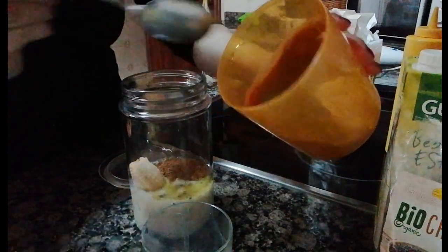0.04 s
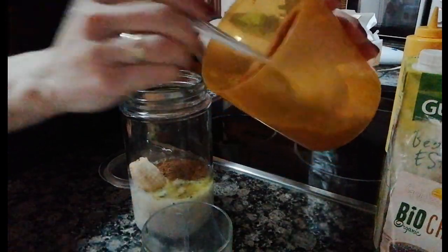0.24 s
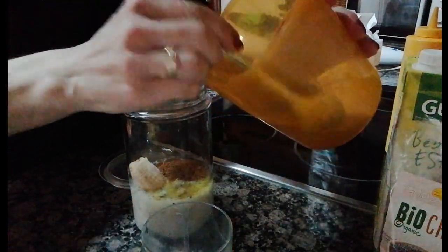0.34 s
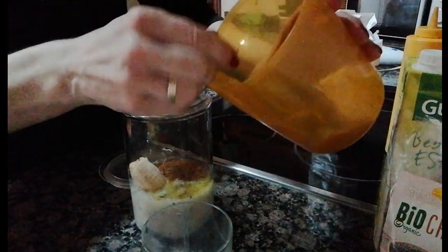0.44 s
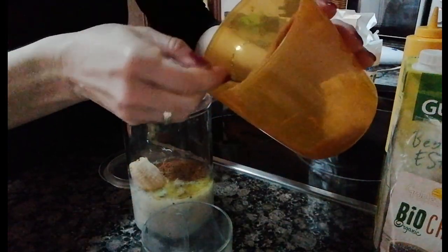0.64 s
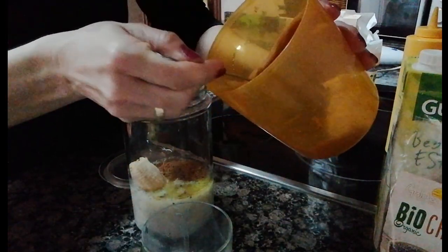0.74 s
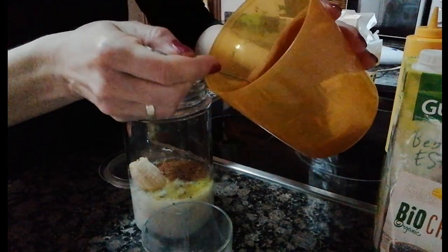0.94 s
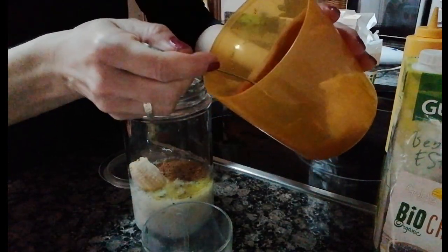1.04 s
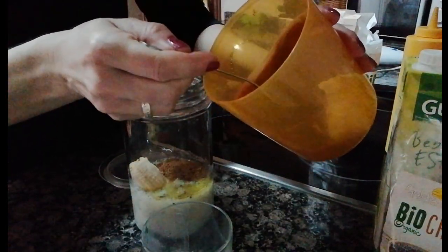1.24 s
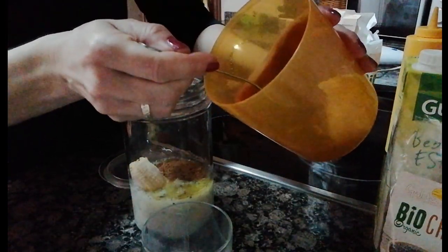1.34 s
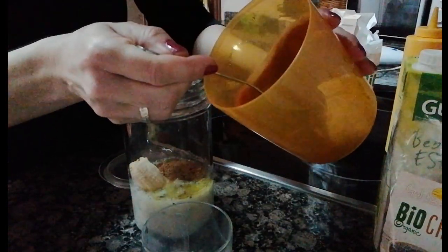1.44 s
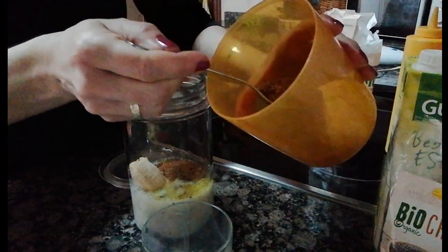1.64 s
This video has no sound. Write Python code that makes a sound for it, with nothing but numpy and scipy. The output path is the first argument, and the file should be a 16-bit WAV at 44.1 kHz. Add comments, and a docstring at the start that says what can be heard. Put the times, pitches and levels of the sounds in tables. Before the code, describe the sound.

A metal spoon scoops sugar from a plastic tub, heard close in a small quiet kitchen. Faint hum and rumble come first. At 0.24 seconds a loud, hollow clack strikes the tub, with a faint metallic ring; gritty crunching follows in three shoves until about 0.7, with another knock near 0.37. The spoon slides out lightly, ticking, clinks at 0.95, then only sparse, very faint ticks remain.

```python
"""Quiet kitchen, close microphones: a metal spoon is pushed into a tilted plastic tub of sugar.
It strikes the wall (noise bursts), crunches through the sugar in three shoves (random grain clicks)
and knocks the tub, which rings hollowly (damped modes). It slides out with small ticks and one clink.
A faint spoon ring (decaying sines), mains hum and room rumble (shaped noise) lie underneath."""
import sys
import numpy as np
from scipy import signal
from scipy.fft import rfft, irfft
from scipy.io import wavfile

SR = 44100
rng = np.random.default_rng(int(sys.argv[2]) if len(sys.argv) > 2 else 0)


def store_wav(level_fs):
    """Save 16-bit WAV to argv[1]."""
    pcm = np.round(np.clip(np.atleast_2d(level_fs), -1, 1) * 32767)
    wavfile.write(sys.argv[1], SR, pcm.T.astype(np.int16))


N = 74970
LEFT_LAG_S = 0.00077


def amp(db):
    """Decibels to gain."""
    return 10 ** (np.asarray(db) / 20)


def evened(x):
    """Scales to rms 1 over all channels."""
    return x / np.sqrt(np.mean(x ** 2) + 1e-20)


def read(points, hz):
    """Interpolates a table on a log-frequency axis."""
    f, value = np.transpose(points)
    return np.interp(np.log(hz + 1), np.log(f), value)


def level(points):
    """Gain over time from (time [s], level [dB]) points, practically silent outside them."""
    s, db = np.transpose(points)
    return amp(np.interp(np.arange(N) / SR, s, db, left=-140, right=-140))


def add(mix, s, sound):
    """Mixes a sound in at time s, cut at the end of the mix."""
    part = mix[..., round(s * SR):][..., :sound.shape[-1]]
    part += sound[..., :part.shape[-1]]


def convolve(x, response):
    """Passes both channels through a response."""
    return signal.fftconvolve(np.atleast_2d(x), np.atleast_2d(response), axes=1)[:, :N]


def dying(t, t60):
    """Exponential decay, 60 dB in t60."""
    return np.exp(-np.log(1000) * t / t60)


# level of the tub's sounds, left minus right: (frequency [Hz], level [dB])
LEFT_OVER_RIGHT = [(150, 1), (430, -3), (620, -7), (1100, -4.5), (2300, 1), (3700, -6), (5000, -3.5),
                   (7500, -2), (12000, 2.5)]


def colour(x, points):
    """Minimum-phase filter of unit mean power with the given spectrum and left-right balance."""
    hz = abs(np.fft.fftfreq(4096, 1 / SR))
    tilt_db = np.outer([.5, -.5], read(LEFT_OVER_RIGHT, hz))
    log_gain = np.log(amp(read(points, hz) + tilt_db))
    spectrum = np.exp(np.conj(signal.hilbert(log_gain)))
    taps = np.fft.ifft(spectrum).real[:, :len(hz) // 2]
    return convolve(x, taps / np.sqrt(np.sum(taps ** 2) / 2))


# reverberation time: (frequency [Hz], t60 [s])
ROOM_T60 = [(200, 0.75), (1000, 0.29), (5000, 0.25), (15000, 0.26)]
ROOM_BUILD_S = 0.00183


def in_room(x, wet_db, size=256):
    """Adds the kitchen's reflections: a noise tail that builds up quickly, its bass lasting longest."""
    hz, t, z = signal.stft(rng.standard_normal((2, SR // 2)), SR, nperseg=size)
    decay = amp(-60 * t / read(ROOM_T60, hz)[:, None])
    build = 1 - np.exp(-t / ROOM_BUILD_S)
    tail = signal.istft(z * decay * build, SR, nperseg=size)[1]
    return x + amp(wet_db) * convolve(x, tail / np.linalg.norm(tail[0]))


SHARED_HZ = 1045


def pair(x):
    """Two close microphones: the bass is shared and reaches the left later, the treble differs."""
    hz, (left, right) = np.fft.rfftfreq(N, 1 / SR), rfft(x)
    shared = 1 / (1 + (hz / SHARED_HZ) ** 4)
    lagged = right * np.exp(-2j * np.pi * hz * LEFT_LAG_S)
    return irfft([shared * lagged + np.sqrt(1 - shared ** 2) * left, right], N)


# mains hum: (frequency [Hz], rms level [dB])
HUM = [(99.7, -59), (201, -72.5), (300, -67.5), (350, -72)]
HUM_WAVER = .45
# room rumble and hiss: (frequency [Hz], level [dB])
FLOOR_COLOUR = [(15, -6.5), (35, -0.5), (70, -4), (170, -5.5), (260, -10.5), (340, -11.5), (480, -24.5),
                (1000, -20.5), (2500, -26.5), (5000, -25.5), (15500, -31)]
FLOOR_RMS_DB, FLOOR_MONO_HZ = -58, 421
RUMBLE_APART_HZ, RUMBLE_RIGHT_DB = 63, 3


def kitchen(count=14):
    """Wavering mains hum over rumble and thin hiss; the deepest rumble differs between microphones."""
    t, hz = np.arange(N) / SR, np.fft.rfftfreq(N, 1 / SR)
    z = rfft(rng.standard_normal((3, N)))
    deep = 1 / (1 + (hz / RUMBLE_APART_HZ) ** 4)
    shared = (1 - deep) / (1 + (hz / FLOOR_MONO_HZ) ** 2)
    gain = amp(read(FLOOR_COLOUR, hz) + np.outer([-.5, .5], RUMBLE_RIGHT_DB * deep))
    noise = z[:2] * np.sqrt(1 - shared) + z[2] * np.sqrt(shared)
    out = amp(FLOOR_RMS_DB) * evened(irfft(noise * gain, N))
    for line_hz, db in HUM:
        a, b = signal.resample(rng.standard_normal((2, count)), N, axis=1)
        waver = 1 + HUM_WAVER * (a + 1j * b)
        out = out + amp(db) * evened((waver * np.exp(2j * np.pi * line_hz * t)).real)
    return out


# starts of the spoon's ring: (time [s], gain on the modes [dB])
RING_STARTS = [(0, 3), (.284, 25.5)]
# modes of the spoon: (frequency [Hz], level before that gain [dB], t60 [s])
SPOON_MODES = [(2170, -62.5, 0.3), (2220, -64.5, 0.42), (3904, -70.5, 0.17)]


def spoon():
    """Faint beating ring of the spoon: close modes dying away, phased apart per channel."""
    out, t = np.zeros((2, N)), np.arange(N) / SR
    for s, ring_db in RING_STARTS:
        for hz, db, t60 in SPOON_MODES:
            cycles = hz * t + rng.random((2, 1)) / 2
            add(out, s, amp(ring_db + db) * dying(t, t60) * np.sin(2 * np.pi * cycles))
    return out


TREBLE_HZ = 8000
SPOT_DB, SPOT_Q = -3.5, 3.4


def contacts(rows, t60, snap):
    """Each contact is a sharp snap and a scatter of decaying noise, tinted by the spot struck."""
    out, t = np.zeros((2, N)), np.arange(SR // 8) / SR
    treble = signal.butter(1, TREBLE_HZ, "high", fs=SR)
    for s, db, treble_db, spot_hz in rows:
        burst = rng.choice([-1., 1.], (2, len(t))) * dying(t, t60)
        burst[:, 0] = snap
        spot = signal.lfilter(*signal.iirpeak(spot_hz, SPOT_Q, fs=SR), burst)
        burst = burst + amp(SPOT_DB) * spot
        bright = (amp(treble_db) - 1) * signal.lfilter(*treble, burst)
        add(out, s, amp(db) * (burst + bright))
    return out


# spoon on tub wall: (time [s], level [dB], extra treble [dB], pitch of the struck spot [Hz])
STRIKES = [(.2338, -30.5, -8, 4750), (.2361, -11, 5, 1205), (.2395, -17, 6.5, 4910),
           (.2835, -23, 3.5, 1630), (.3010, -30, 9, 4540), (.3595, -20.5, -3, 3480),
           (.3660, -17.5, -20, 900)]
# (frequency [Hz], level [dB])
STRIKE_COLOUR = [(40, -16), (300, -4.5), (800, -5.5), (1300, -0.5), (2400, -8.5), (3400, 0), (4200, -1.5),
                 (4950, 4), (5700, -6), (7500, -1.5), (9500, -9.5), (15500, -14.5)]
STRIKE_T60_S, STRIKE_SNAP = 0.033, 5.5


def strikes():
    """The spoon strikes the tub wall: snaps and noise bursts in the wall's colour."""
    return colour(pair(contacts(STRIKES, STRIKE_T60_S, STRIKE_SNAP)), STRIKE_COLOUR)


# modes of the tub and the air in it: (frequency [Hz], level [dB], t60 [s])
TUB_MODES = [(270, -8, 0.12), (364, -8, 0.13), (434.7, -0.5, 0.065), (592.6, -1.5, 0.17), (636, -6.5, 0.12),
             (694, 0, 0.087), (819, -6.5, 0.15), (905, 3, 0.05), (1181, 0.5, 0.072), (1260, 0, .06)]
PUSH_OCTAVES, PUSH_S = 0.33, 0.00035


def tub_ring(push_hz, ring_share=1):
    """Modes near push_hz answer most, their t60 cut by the spoon to ring_share; the left lags."""
    t = np.maximum(np.arange(SR // 3) / SR - np.array([[LEFT_LAG_S], [0]]), 0)
    ring = 0
    for k, (hz, db, t60) in enumerate(TUB_MODES):
        tilt_db = np.array([[.5], [-.5]]) * read(LEFT_OVER_RIGHT, hz)
        gain = amp(db + tilt_db) / (1 + (np.log2(hz / push_hz) / PUSH_OCTAVES) ** 2)
        sign = (-1) ** k
        ring = ring + sign * gain * dying(t, t60 * ring_share) * np.sin(2 * np.pi * hz * t)
    return ring * (1 - np.exp(-t / PUSH_S))


# knocks on the tub: (time [s], level [dB], centre of the push [Hz], share of t60 left by the spoon [1])
KNOCKS = [(0.2357, -8.5, 427, .4), (.3655, -17.5, 664, 0.89), (.477, -26.5, 620, 0.77),
          (.9468, -40.5, 430, 0.12)]
# how firmly the scraping spoon bears on the wall: (time [s], level [dB])
WALL_PRESSURE = [(.24, -31), (.34, -6), (.39, 1.5), (.49, -4.5), (.61, -14), (.75, -0.5), (.80, -29)]
CRUNCH_PUSH_HZ, RING_ROOM_DB = 670, -15


def tub(drive):
    """The tub rings under the knocks and, softly, as the spoon scrapes along its wall."""
    ring = tub_ring(CRUNCH_PUSH_HZ)
    out = convolve(drive[0] * level(WALL_PRESSURE), ring / np.linalg.norm(ring[1]))
    for s, db, push_hz, ring_share in KNOCKS:
        add(out, s, amp(db) * tub_ring(push_hz, ring_share))
    return in_room(out, RING_ROOM_DB)


def grains(per_s, spread_db):
    """Sugar slipping: random clicks of uneven size, drawn separately for each microphone."""
    size = amp(spread_db * np.minimum(rng.exponential(1, N), 4))
    hit = rng.random(N) < per_s / SR
    return evened(size * hit * rng.standard_normal((2, N)))


# spoon crunching through the sugar: (time [s], level [dB])
CRUNCH = [(.236, -71), (.244, -26.5), (.272, -28.5), (.30, -30), (.325, -32), (.355, -29.5), (.385, -50),
          (.41, -39), (.445, -33.5), (.48, -30), (.544, -37.5), (.582, -40.5), (.606, -42), (.638, -34),
          (.664, -36), (.69, -44), (.76, -53.5), (.80, -62.5)]
# fine crystals: (frequency [Hz], level [dB])
CRUNCH_COLOUR = [(60, -19.5), (300, -10.5), (700, -5.5), (1000, -21.5), (1400, -1), (2600, -4), (3700, 3.5),
                 (5000, 4), (7000, 1), (10000, -5.5), (15500, -13.5)]
# cracking lumps: (frequency [Hz], level [dB])
LUMP_COLOUR = [(300, -17), (1400, -3), (3300, 0.5), (6000, -2.5), (15500, -15)]
# low rumble of the tub wall under the spoon: (frequency [Hz], level [dB])
RUB_COLOUR = [(30, -18.5), (130, -7.5), (230, 1.5), (330, -13), (480, -17), (1500, -43.5)]
GRAINS_PER_S, GRAIN_SPREAD_DB = 12000, 2.6
LUMPS_PER_S, LUMP_SPREAD_DB, LUMPS_DB = 1200, 1.7, -8
RUB_DB, DIG_ROOM_DB = -27, -7.5


def digging():
    """Wall strikes, then fine crystals and sparser lumps crunching; the crystals also drive the tub."""
    drive = pair(grains(GRAINS_PER_S, GRAIN_SPREAD_DB)) * level(CRUNCH)
    fine = colour(drive, CRUNCH_COLOUR)
    lump_drive = grains(LUMPS_PER_S, LUMP_SPREAD_DB) * level(CRUNCH)
    lumps = amp(LUMPS_DB) * colour(lump_drive, LUMP_COLOUR)
    rub = amp(RUB_DB) * colour(drive, RUB_COLOUR)
    return in_room(strikes() + fine + lumps + rub, DIG_ROOM_DB) + tub(drive)


# spoon sliding lightly out over the sugar: (time [s], level [dB])
SLIDE = [(.70, -60), (.775, -51), (.802, -43.5), (.826, -40), (.86, -48), (.90, -47.5), (.925, -50.5),
         (.972, -41), (1.01, -67), (1.12, -87)]
# spoon on rim: (time [s], level before TICKS_DB [dB], extra treble [dB], pitch of the struck spot [Hz])
TICKS = [(.8018, -41, -3, 4600), (.8313, -38, 2, 3600), (.8530, -39, -1, 4700), (.8866, -39, 3, 6200),
         (.8931, -36.5, 4, 6200), (.9292, -30, -6, 3800), (.9326, -29, -2, 4800), (.9468, -18, -3, 4900),
         (1.0745, -41, 1, 3500), (1.3305, -55, 1, 5500), (1.4620, -48.5, 2, 5600), (1.5640, -55, 2, 5800),
         (1.5722, -50, 5, 6000), (1.6820, -53, 2, 5800)]
# (frequency [Hz], level [dB])
TICK_COLOUR = [(80, -27.5), (300, -18.5), (1000, -15), (1700, -19), (2200, -13), (2800, -15.5),
               (3600, -1.5), (4200, -5.5), (4800, 2), (5600, -5.5), (6800, -1), (8200, -8), (15500, -19.5)]
SLIDE_PER_S, SLIDE_SPREAD_DB = 9000, 2.4
TICK_T60_S, TICK_SNAP, TICKS_DB, TICK_ROOM_DB = 0.015, 1.92, -0.5, -13


def lifting():
    """The spoon slides out (grain clicks) and ticks on the rim (short bursts), in one colour."""
    slide = grains(SLIDE_PER_S, SLIDE_SPREAD_DB) * level(SLIDE)
    ticks = amp(TICKS_DB) * contacts(TICKS, TICK_T60_S, TICK_SNAP)
    return in_room(colour(slide + ticks, TICK_COLOUR), TICK_ROOM_DB)


def scene():
    """Sums kitchen, spoon ring, digging and lifting."""
    return kitchen() + spoon() + digging() + lifting()


EDGE_HZ = 15850


def record(dry):
    """Overload at full scale, then the band limit."""
    low_pass = signal.firwin(511, EDGE_HZ, window=("kaiser", 9), fs=SR)
    return signal.oaconvolve(np.clip(dry, -1, 1), low_pass[None], "same")


dry = scene()
out = record(dry)
store_wav(out)
```